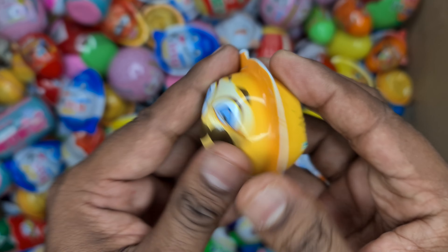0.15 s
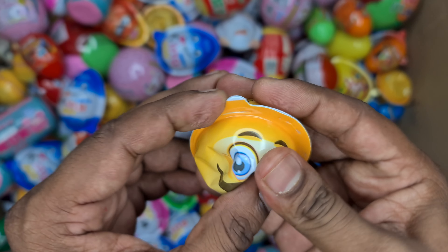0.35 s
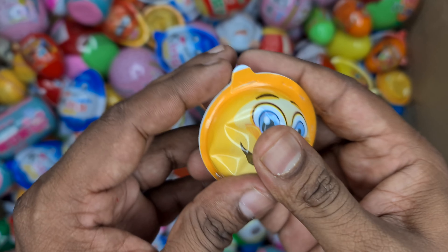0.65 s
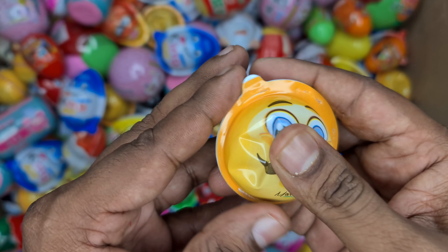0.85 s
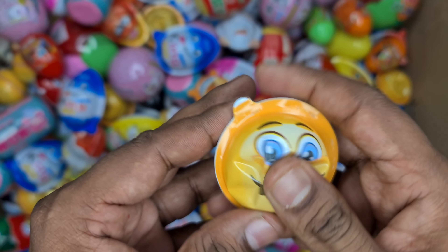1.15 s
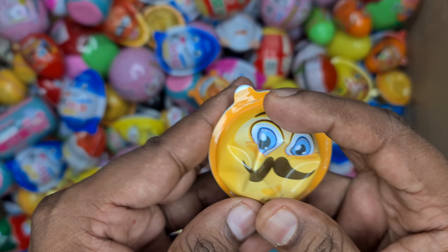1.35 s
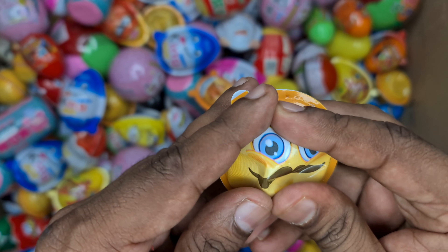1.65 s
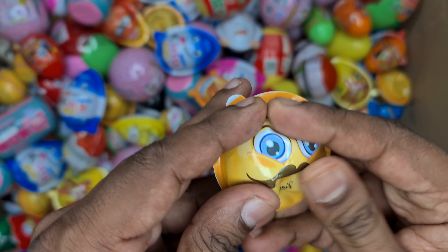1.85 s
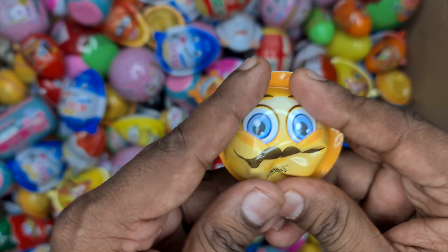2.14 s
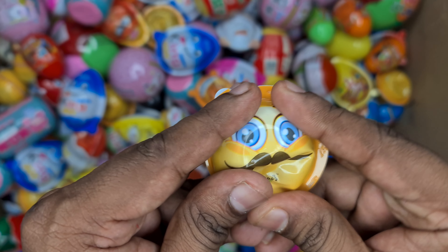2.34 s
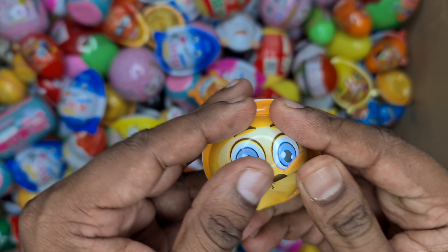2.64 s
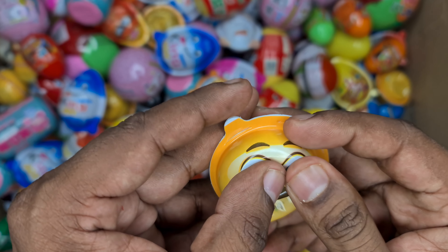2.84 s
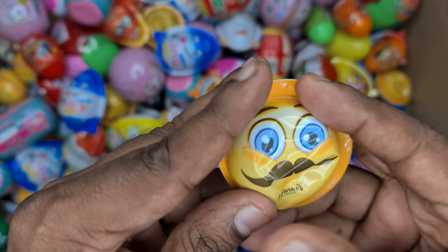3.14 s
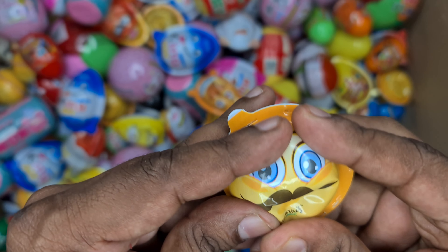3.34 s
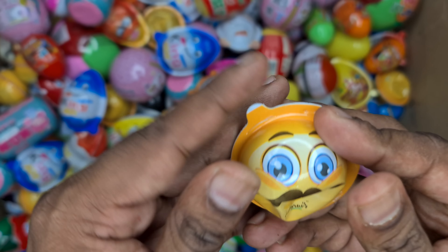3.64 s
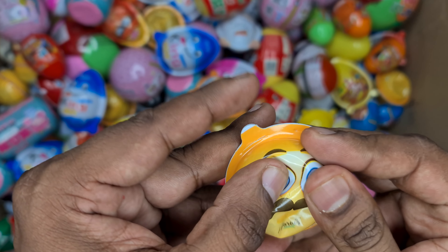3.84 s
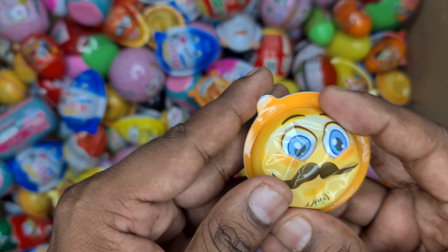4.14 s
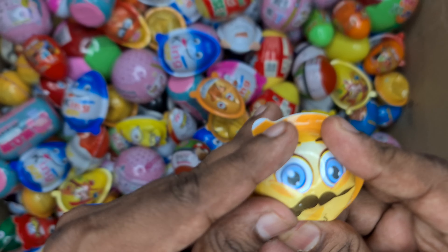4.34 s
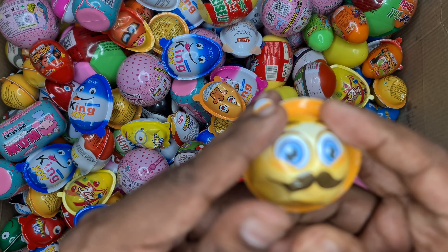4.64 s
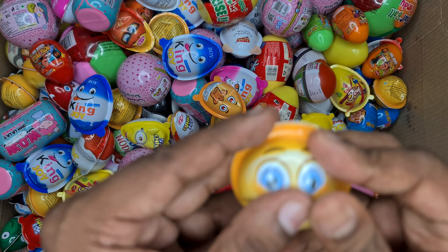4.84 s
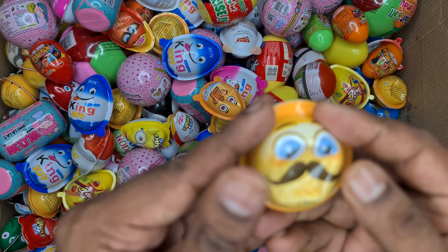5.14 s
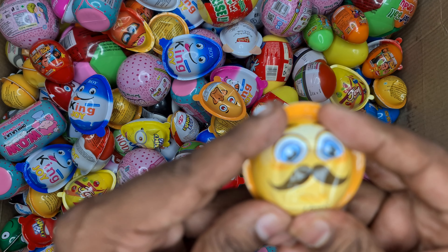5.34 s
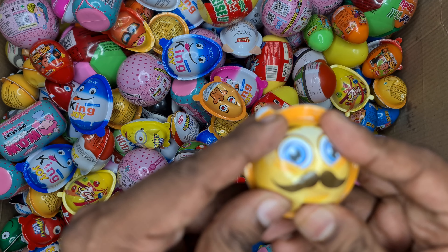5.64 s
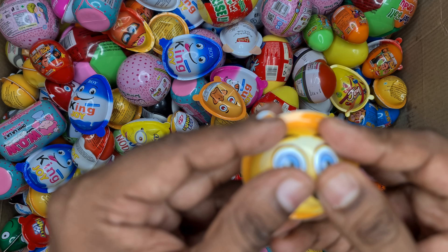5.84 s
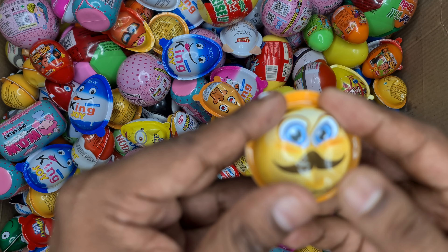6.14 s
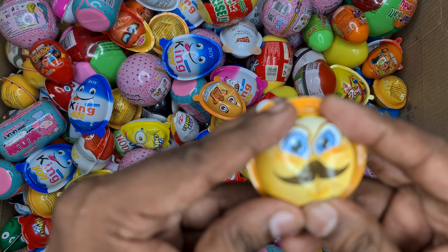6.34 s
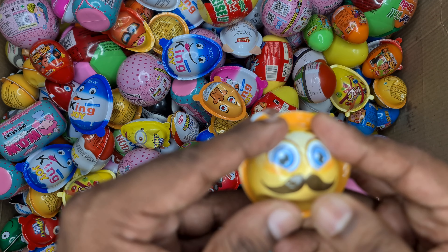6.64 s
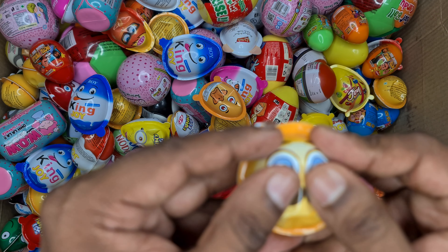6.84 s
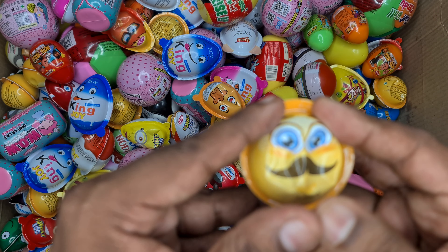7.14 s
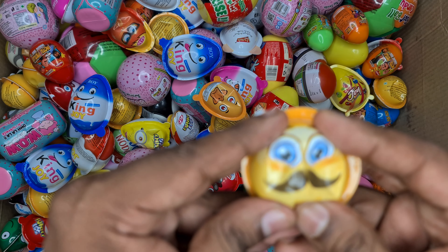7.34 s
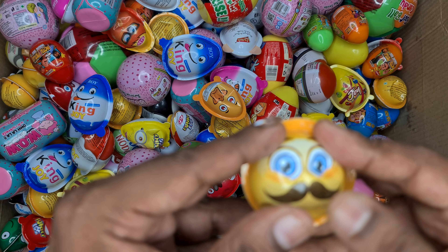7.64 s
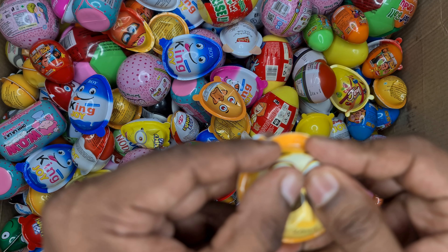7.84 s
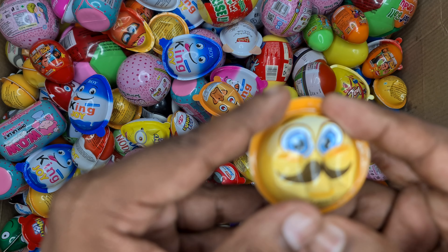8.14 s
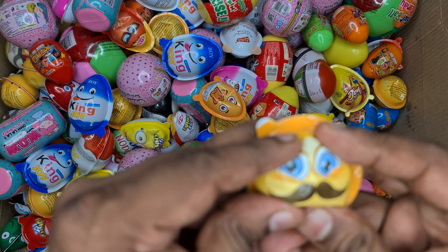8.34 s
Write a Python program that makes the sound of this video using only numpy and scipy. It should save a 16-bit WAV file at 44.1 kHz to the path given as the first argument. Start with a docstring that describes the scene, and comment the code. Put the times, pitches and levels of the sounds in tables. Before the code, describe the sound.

Close-up hollow plastic pops and bright creasing snaps from a hand-squeezed capsule, with faint wrapper crinkle and a short room echo.

```python
"""Squeezed plastic capsule

Two hands squeeze a thin plastic toy capsule with a foil-wrapper lid, close up in a small, live room.
About twice a second the walls buckle in clusters of snaps: filtered impulses pop, thud and ring the cup;
noise bursts crack the creases. Stick-slip grains make fingertip rubs; dense tiny ticks make a faint crinkle
that swells around each snap. Later the grip rumbles; decaying noise is the room echo, over a steady hush."""
import sys
import numpy as np
from scipy import signal
from scipy.fft import rfft, irfft
from scipy.io import wavfile

SR = 44100
rng = np.random.default_rng(int(sys.argv[2]) if len(sys.argv) > 2 else 0)


def generate_wav(signal):
    """Clip the signal to [-1, 1] and save it as 16-bit WAV at the path in sys.argv[1]."""
    frames = np.transpose(np.atleast_2d(signal))
    scaled = np.clip(frames, -1, 1) * 32767
    pcm = np.round(scaled).astype(np.int16)
    wavfile.write(sys.argv[1], SR, pcm)


N = 373968


def from_db(db):
    """Decibels to amplitude."""
    return 10 ** (np.asarray(db) / 20)


def rms_one(x):
    """Scales to unit rms."""
    return x / np.sqrt(np.mean(x ** 2) + 1e-20)


def energy_one(x):
    """Scales to unit energy."""
    return x / np.sqrt(np.sum(x ** 2) + 1e-20)


def at_hz(points, hz):
    """Reads a spectrum table on a log-frequency axis."""
    table = np.array(points)
    return np.interp(np.log(hz + 1e-3), np.log(table[:, 0]), table[:, 1])


def band(x, low_hz, high_hz):
    """Causal band-pass."""
    edges_hz = [low_hz, min(high_hz, SR / 2 - 500)]
    return signal.sosfilt(signal.butter(2, edges_hz, "band", fs=SR, output="sos"), x)


def coloured(x, spectrum):
    """Filters a noise by a spectrum table."""
    size = x.shape[-1]
    gain = from_db(at_hz(spectrum, np.fft.rfftfreq(size, 1 / SR)))
    return irfft(rfft(x) * gain, size)


def add(track, s, sound):
    """Mixes a short sound in at time s."""
    start = max(round(s * SR), 0)
    track[..., start:start + sound.shape[-1]] += sound[..., :max(N - start, 0)]


def placed(x, pan_db, lag_ms):
    """Makes left louder by pan_db and earlier by lag_ms."""
    left, right = np.broadcast_to(x, (2, x.shape[-1]))
    late_right = np.roll(right, round(lag_ms * SR / 1000))
    return np.array([left * from_db(pan_db / 2), late_right * from_db(-pan_db / 2)])


# likeness of the two ears in a diffuse field: (frequency_hz, correlation [-1..1])
EAR_LIKENESS = [(25, 0.31), (60, 0.23), (130, 0.044), (290, 0.14), (640, 0.64), (1400, -0.67),
                (3000, -0.015), (15000, 0.31)]


def diffuse_noise(size):
    """White noise from all around, its left-right correlation set per frequency."""
    mid, side = rfft(rng.standard_normal((2, size)))
    alike = np.clip(at_hz(EAR_LIKENESS, np.fft.rfftfreq(size, 1 / SR)), -1, 1)
    return irfft(np.sqrt(1 + alike) * mid + np.sqrt(1 - alike) * side * [[1], [-1]], size)


# still air of the room, relative spectrum: (frequency_hz, density_db_per_hz)
HUSH_COLOUR = [(25, -12.5), (45, -5.5), (70, 5), (120, -8), (200, -6), (400, -0.5), (560, -15),
               (900, -10.5), (1600, -20.5), (2600, -18.5), (5000, -24.5), (9000, -24), (13000, -21.5),
               (16000, -34)]


def hush(level_db=-69):
    """Steady diffuse noise of the still air."""
    return from_db(level_db) * rms_one(coloured(diffuse_noise(N), HUSH_COLOUR))


def sharpness(pop_db, crack_db, mid_db=-11.5, range_db=11.5):
    """Crack-to-pop ratio as character: 0 is a round wall pop, 1 a bare crease crack."""
    return .5 + .5 * np.tanh((crack_db - pop_db - mid_db) / range_db)


def pop_octaves(pop_db, thud_db, crack_db):
    """Bandwidth of the pop: sharp snaps flip faster and strong thuds flip deeper, so both are broader."""
    dull_octaves, sharp_octaves = 0.88, 1.28
    widen_octaves_per_db, thud_mid_db = 0.012, -14.0
    octaves = np.interp(sharpness(pop_db, crack_db), [0, 1], [dull_octaves, sharp_octaves])
    return octaves + widen_octaves_per_db * (thud_db - pop_db - thud_mid_db)


def pop(t, low_hz, high_hz, top_ratio=1.046, second_db=-9.5, second_max_ms=1.3):
    """A wall panel flips and swings as a band-passed impulse, then flips again, smaller."""
    panel = band(t == 0, low_hz, max(high_hz, 1.2 * low_hz))
    delay_ms = rng.uniform(0.27, 1) * second_max_ms
    swing = panel + from_db(second_db) * np.roll(panel, round(delay_ms * SR / 1000))
    # the flip takes time, so it carries little treble
    low_pass = signal.butter(3, high_hz * top_ratio, fs=SR, output="sos")
    return energy_one(signal.sosfilt(low_pass, swing))


def thud(t, low_hz=178.0, high_hz=624.0, jolt_low_hz=58.6, jolt_high_hz=133.0, jolt_db=-16.0):
    """The flip shoves the air in the cup, one low swing, and jolts the hands that hold it."""
    shove = energy_one(band(t == 0, low_hz, high_hz))
    jolt = energy_one(band(t == 0, jolt_low_hz, jolt_high_hz))
    return shove - from_db(jolt_db) * jolt


# crease spectrum, relative: (frequency_hz, density_db_per_hz)
CREASE_COLOUR = [(200, -22), (1500, -17.5), (2600, 7), (3300, 0.5), (4600, -0.5), (6500, -3), (9000, -2),
                 (12000, -3.5), (14000, -4.5), (16000, -11.5)]
CRACK_PEAK_S = .003  # crack start to its peak


def crack(t, hz, octaves=0.75, skirt=4.1, ring_db=-20.0, ring_t60_s=.014, apart=0.77):
    """A crease gives way in tiny slips, a noise burst brightest around its own pitch.

    Returns the grainy sound at the two ears, and the smooth sum of all directions that fills the room."""
    bins_hz = np.fft.rfftfreq(len(t), 1 / SR)
    # each crease has resonances of its own
    ripple_db = np.interp(bins_hz, np.geomspace(1500, 16000, 28), rng.normal(0, 2.8, 28))
    peak = 1 / np.sqrt(1 + np.abs(np.log2((bins_hz + 1) / hz) / octaves) ** skirt)
    colour = from_db(at_hz(CREASE_COLOUR, bins_hz) + ripple_db) * peak
    shared, left, right = rng.standard_normal((3, len(t)))
    slips = irfft(rfft(shared + apart * np.array([left, right])) * colour, len(t))
    # the noise swells for about 3 ms to its peak, then dies away
    before_s, after_s = np.maximum(CRACK_PEAK_S - t, 0), np.maximum(t - CRACK_PEAK_S, 0)
    swell_t60_s, slip_t60_s = .003, .0058
    swell = from_db(-60 * before_s / swell_t60_s)
    decay = from_db(-60 * after_s / slip_t60_s) + from_db(ring_db - 60 * after_s / ring_t60_s)
    all_round = np.roll(irfft(colour, len(t)), round(CRACK_PEAK_S * SR))
    return np.sqrt(2) * energy_one(slips * swell * decay), energy_one(all_round)


# cup resonances, damped by the fingers: (frequency_hz, level_db, t60_s)
CUP_RESONANCES = [(392, -5.5, 0.043), (787, -27.5, 0.16), (1066, -14, 0.078), (1330, -10.5, 0.084),
                  (1960, -22, 0.044), (2183, -17, 0.0077)]


def cup_ring(x):
    """Pops and thuds drive the cup modes, two-pole resonators of alternating sign."""
    out = 0
    for k, (hz, level_db, t60_s) in enumerate(CUP_RESONANCES):
        radius, angle = from_db(-60 / (t60_s * SR)), 2 * np.pi * hz / SR
        zeros = [1 - radius, 0, radius - 1]
        poles = [1, -2 * radius * np.cos(angle), radius * radius]
        # the tiny offset keeps the filter state off denormals
        out = out + (-1) ** k * from_db(level_db) * signal.lfilter(zeros, poles, x + 1e-18)
    return out


# buckling snaps, levels as 3 ms rms before trims, panning and cup ring:
# (peak_s, pop_db, pop_hz, thud_db, crack_db, crack_hz, into_room_db)
BUCKLES = [ (0.1529, -45, 1530, -61, -56.5, 7400, 8), (0.2662, -27, 1800, -60, -33.5, 3150, -1),
           (0.37, -26, 975, -35, -46, 3600, -1.5), (0.8284, -31, 1610, -63, -41, 6400, -1.5),
           (1.007, -53, 1410, -72, -56, 5800, 4), (1.06, -44.5, 1070, -56, -80, 5000, -4),
           (1.1998, -48, 1080, -58, -58, 7500, 3.5), (1.246, -39, 1190, -47.5, -55, 4300, 4.5),
           (1.6552, -54.5, 655, -47, -73.5, 5000, 3), (1.692, -32, 1510, -48, -47.5, 3500, 1.5),
           (1.7095, -24.5, 850, -31.5, -46, 3800, -0.5), (1.7227, -17.5, 1015, -20, -37, 4500, -3.5),
           (1.8232, -12.5, 1205, -22.5, -21, 4200, -2.5), (1.9541, -27.5, 1730, -50.5, -33, 4500, -1),
           (2.243, -56, 1120, -62, -68, 5000, -6), (2.37, -66, 1270, -62.5, -70, 3990, 0),
           (2.397, -54, 1070, -54, -52, 7000, 1), (2.4698, -47, 1810, -56.5, -36.5, 6500, 3.5),
           (2.528, -40, 1980, -61, -29, 8700, 1), (2.5961, -32, 1500, -45, -60.5, 3900, 5.5),
           (2.6577, -31.5, 1450, -50.5, -28, 4800, 2.5), (2.785, -17, 1216, -48, -32, 4300, 3.5),
           (2.797, -13, 1950, -39.5, -17, 6500, 1.5), (2.9137, -32, 1130, -36.5, -57, 6500, -3),
           (2.9214, -35, 1520, -45.5, -23, 6300, 0), (3.1147, -23.5, 1140, -39, -71, 4300, 1),
           (3.152, -22, 790, -27.5, -60, 3200, -15), (3.1919, -29.5, 893, -62, -37.5, 6000, -4),
           (3.317, -55.5, 960, -78, -78, 4000, -5), (3.3884, -46.5, 1430, -45.5, -47.5, 3600, 17.5),
           (3.4063, -16.5, 1282, -26, -18.5, 7500, 7.5), (3.6042, -44.5, 2210, -58, -45.5, 3400, 2.5),
           (3.6548, -48, 1350, -53, -53.5, 5600, -1.5), (3.8168, -26.5, 765, -32, -46, 5500, 4),
           (3.835, -20, 1930, -34.5, -15, 6500, 6.5), (3.913, -35.5, 1420, -44, -19, 9000, 6.5),
           (4.0638, -38.5, 875, -56.5, -59, 6000, 3), (4.0723, -34, 1890, -60, -37.5, 3400, -2.5),
           (4.2804, -30.5, 1040, -45, -69, 4300, -4), (4.3115, -20, 1220, -37.5, -40.5, 3900, -3),
           (4.365, -32.5, 1020, -37, -68, 5000, -6), (4.373, -22, 795, -31, -68.5, 4900, -5),
           (4.4083, -19, 1080, -18.5, -24.5, 5100, 1), (4.4178, -20, 990, -28, -30, 5200, -9),
           (4.4776, -29.5, 2010, -47, -13, 8300, 1.5), (4.4843, -11.5, 1620, -22, -19, 5200, -1),
           (4.6329, -34.5, 1260, -42.5, -47, 4700, 1), (4.787, -56.5, 890, -76.5, -54, 8800, -9.5),
           (4.9182, -42.5, 900, -49, -46.5, 5000, 3.5), (4.926, -22.5, 1155, -38.5, -38.5, 5900, 9),
           (4.9385, -14, 1780, -33, -15.5, 7300, 6), (4.9711, -13, 1420, -27, -17.5, 5700, 7),
           (4.9946, -16, 1230, -26, -23.5, 4800, -5.5), (5.124, -41.5, 1128, -53, -56.5, 4300, 2),
           (5.1612, -44.5, 1052, -55, -62, 4500, -1), (5.4197, -52, 957, -58.5, -68, 5000, 2),
           (5.433, -35, 1330, -38, -27.5, 6800, 3), (5.4702, -20, 1400, -37, -32.5, 6400, 1.5),
           (5.482, -43, 920, -47, -43.5, 6000, -4), (5.5003, -12, 880, -33.5, -18, 5500, -6),
           (5.6748, -39, 1380, -43.5, -26, 7300, 1.5), (5.7031, -25, 1236, -34, -37, 5200, 0.5),
           (5.7327, -40, 874, -47, -51.5, 4900, -2), (5.76, -46, 1240, -53.5, -62.5, 6700, 0.5),
           (5.927, -18.5, 1270, -37.5, -25, 3600, 4.5), (5.94, -30.5, 1620, -33, -13.5, 7400, 5.5),
           (5.963, -20, 1340, -27.5, -14, 7900, 10), (6.1193, -36, 972, -39.5, -34.5, 9300, 6.5),
           (6.1257, -27.5, 1440, -36, -23, 6900, 1), (6.402, -55, 894, -58, -63, 4000, 0.5),
           (6.4342, -31, 1830, -51, -34, 4850, 0), (6.461, -14, 1180, -29, -24.5, 4000, -1.5),
           (6.4701, -30.5, 970, -27.5, -42.5, 4000, -2), (6.4728, -9, 1015, -19.5, -31.5, 4500, -9),
           (6.5128, -19, 1200, -39, -14.5, 7900, 5.5), (6.6703, -34, 1600, -43, -22, 7400, 1.5),
           (6.898, -39, 1650, -52.5, -46, 3400, 1), (6.92, -14, 1470, -29.5, -17, 6850, 4),
           (6.9273, -19.5, 1360, -32, -36.5, 3700, 7), (6.9314, -19.5, 1650, -36, -37, 3700, -2),
           (6.9343, -20.5, 1310, -36.5, -13.5, 7900, 5), (7.3698, -49, 1610, -63, -58.5, 3200, 4),
           (7.408, -29.5, 1770, -52.5, -24.5, 4570, -0.5), (7.415, -13.5, 1330, -37, -26, 6600, 3),
           (7.4251, -10, 1040, -22, -21, 5800, -3), (7.4382, -15, 1230, -28.5, -14, 8900, -2),
           (7.4586, -16.5, 980, -36.5, -28.5, 4700, -6), (7.6227, -40.5, 1450, -70, -50, 3500, 5),
           (7.6349, -46, 1790, -55.5, -39.5, 5600, 1.5), (7.8344, -36, 1100, -43.5, -49, 5400, 1),
           (7.8398, -28, 1060, -47.5, -65, 6000, -7.5), (7.8588, -33.5, 1600, -63.5, -31, 5000, 17),
           (7.8668, -13, 1550, -26, -44, 5200, 3), (7.871, -24, 1260, -33, -10.5, 8300, 2.5),
           (7.8772, -16.5, 1360, -50, -15.5, 8200, 0.5), (8.2821, -35, 1230, -65, -41, 6300, -1),
           (8.3403, -24.5, 1240, -51, -43, 5300, -1), (8.346, -28, 1800, -31.5, -17, 7300, -2),
           (8.357, -12, 1400, -36, -42, 6300, -6), (8.361, -13.5, 1220, -35, -33, 4000, 3),
           (8.3674, -20.5, 1620, -34, -24.5, 6100, 2), (8.3773, -9.5, 1000, -19.5, -44, 5700, -7.5),
           (8.3796, -16, 1070, -53, -28, 7500, -3), (8.3878, -15.5, 1070, -51, -28, 5800, -10),
           (8.422, -19.5, 1380, -37, -14, 7700, 1)]


def snaps(thud_trim_db=-3.0, pop_room_db=-11.0, thud_room_db=-15.5, crack_room_db=-12.0, ring_db=6.0):
    """Each buckle sums pop, thud and crack; returns the direct sound and the sound thrown into the room."""
    t = np.arange(1024) / SR
    wall_lead_s, level_window_s = 0.0011, .003
    walls, creases, thrown = np.zeros((2, N)), np.zeros((2, N)), np.zeros(N)
    for peak_s, pop_db, pop_hz, thud_db, crack_db, crack_hz, into_room_db in BUCKLES:
        half_width = 2 ** (pop_octaves(pop_db, thud_db, crack_db) / 2)
        shove = from_db(thud_db + thud_trim_db) * thud(t)
        swing = from_db(pop_db) * pop(t, pop_hz / half_width, pop_hz * half_width)
        crease, all_round = crack(t, crack_hz)
        crease_lag_ms = rng.normal(.06, .04)  # each snap faces its own way
        # both start early, so that they peak together
        wall_s, crease_s = peak_s - wall_lead_s, peak_s - CRACK_PEAK_S
        wall = placed(swing, pan_db=-3.0, lag_ms=0.08) - placed(shove, pan_db=0.0, lag_ms=.06)
        add(walls, wall_s, wall)
        add(creases, crease_s, from_db(crack_db) * placed(crease, pan_db=1.0, lag_ms=crease_lag_ms))
        # the room share scales pop and crack, not thud
        add(thrown, wall_s, from_db(into_room_db + pop_room_db) * swing - from_db(thud_room_db) * shove)
        add(thrown, crease_s, from_db(crack_db + into_room_db + crack_room_db) * all_round)
    size = np.sqrt(level_window_s * SR)  # unit energy to unit rms over the window
    direct = walls + from_db(ring_db) * cup_ring(walls) + creases
    return size * direct, size * thrown


# wrapper tick spectrum, relative: (frequency_hz, density_db_per_hz)
FOIL_COLOUR = [(200, -23), (600, -2), (1200, 4.5), (2200, 2), (3500, -9.5), (6000, -11.5), (11000, -12),
               (16000, -29.5)]


def crinkle(ticks_per_s=1600.0, near_snap_db=-22.5, idle_db=-82.0, spread_db=4.0):
    """Dense tiny wrapper ticks, faint throughout and louder for a few ms around each snap."""
    rise_s, fall_s = 0.0057, 0.0058
    t, near_snap = np.arange(0, N, 40) / SR, 0
    for peak_s, pop_db, _, _, crack_db, _, _ in BUCKLES:
        distance = np.maximum((peak_s - t) / rise_s, (t - peak_s) / fall_s)
        near_snap = near_snap + from_db(max(pop_db, crack_db)) * np.exp(-distance)
    born = rng.random(N) < ticks_per_s / SR
    size = from_db(spread_db * np.minimum(rng.exponential(1, N), 3))
    ticks = born * rng.choice([-1, 1], N) * size
    level = np.interp(np.arange(N) / SR, t, from_db(idle_db) + from_db(near_snap_db) * near_snap)
    return level * rms_one(coloured(ticks, FOIL_COLOUR))


# fingertip strokes, levels before panning: (middle_s, length_s, pad_db, nail_db)
STROKES = [(0.22, 0.0097, -42, -43.5), (0.498, 0.013, -53, -55.5), (0.602, 0.033, -67, -75),
           (0.64, 0.02, -64.5, -61.5), (0.684, .02, -59, -67), (0.753, 0.069, -65.5, -71),
           (0.928, .016, -74, -55), (0.958, 0.021, -57, -54.5), (1.021, 0.026, -64, -66),
           (1.241, 0.023, -50, -49.5), (1.284, 0.02, -60.5, -66), (1.548, 0.011, -46, -46.5)]
# finger pad on the wall, relative: (frequency_hz, density_db_per_hz)
SKIN_COLOUR = [(300, -32), (700, -15), (1100, 5.5), (1600, -0.5), (2300, -4), (3500, -19), (8000, -35.5)]
# fingernail on the wrapper, relative: (frequency_hz, density_db_per_hz)
SCRATCH_COLOUR = [(1000, -19.5), (2500, -2.5), (5000, -1.5), (7000, 3), (10000, -2), (16000, -20.5)]


def rubs(grain_spread_db=4.5, light_per_s=550.0, pressed_per_s=4100.0):
    """Skin and nail stick and slip in uneven grains, which come faster under more pressure."""
    t, out = np.arange(N) / SR, 0
    middles_s, lengths_s, pad_db, nail_db = np.transpose(STROKES)
    for levels_db, colour in ((pad_db, SKIN_COLOUR), (nail_db, SCRATCH_COLOUR)):
        pressure = 0
        for middle_s, length_s, level_db in zip(middles_s, lengths_s, levels_db):
            pressure = pressure + from_db(level_db) * np.exp(-2 * ((t - middle_s) / length_s) ** 2)
        slips_per_s = light_per_s + pressed_per_s * np.sqrt(pressure / pressure.max())
        # dividing by the root of the rate keeps the power steady
        born = (rng.random(N) < slips_per_s / SR) / np.sqrt(slips_per_s)
        size = from_db(grain_spread_db * np.minimum(rng.exponential(1, N), 3))
        grains = born * rng.standard_normal(N) * size
        out = out + pressure * rms_one(coloured(grains, colour))
    return out


# decay of the diffuse tail: (frequency_hz, t60_s)
TAIL_T60 = [(100, 0.64), (400, 0.38), (1000, 0.38), (2500, 0.43), (5000, 0.4), (9000, 0.35), (15000, 0.25)]
# gain of the echo: (frequency_hz, gain_db)
ECHO_COLOUR = [(80, -4.5), (250, 3), (500, 4.5), (850, -6.5), (1250, -6.5), (1700, -0.5), (2300, -1),
               (3100, -1), (4200, 1.5), (6000, -2), (10000, -5.5), (15000, -1.5)]


def room(x, build_s=0.006, near_db=-4.0, near_t60_s=0.058):
    """Early echoes off box and table, then a diffuse tail that dies band by band, by convolution."""
    size = int(.7 * SR)
    t, hz = np.arange(size) / SR, np.fft.rfftfreq(size, 1 / SR)
    noise, centres_hz, response = rfft(diffuse_noise(size)), np.geomspace(100, 15000, 12), 0
    early = energy_one(from_db(-60 * t / near_t60_s) * (t > .002))
    for k, centre_hz in enumerate(centres_hz):
        share = np.interp(np.log(hz + 1), np.log(centres_hz), np.arange(len(centres_hz)) == k)
        decay = from_db(-60 * t / at_hz(TAIL_T60, centre_hz))
        tail = energy_one(decay * (1 - np.exp(-(t / build_s) ** 2)))
        envelope = np.hypot(tail, from_db(near_db) * early)
        response = response + irfft(noise * share, size) * envelope * from_db(at_hz(ECHO_COLOUR, centre_hz))
    return signal.fftconvolve(x[None], response, axes=1)[:, :N]


# shifts of the grip: (peak_s, level_db, t60_s)
GRIP_SHIFTS = [(5.505, -54.5, 0.7), (5.97, -52.5, 1.54), (6.54, -64.5, 1)]


def grip(low_hz=50.0, high_hz=130.0, attack_s=.04):
    """Palms rolling on the shell: low noise that swells quickly and dies away."""
    t, level = np.arange(N) / SR, 0
    for peak_s, level_db, t60_s in GRIP_SHIFTS:
        swell = np.clip(1 + (t - peak_s) / attack_s, 0, 1)
        level = level + from_db(level_db - 60 * np.maximum(t - peak_s, 0) / t60_s) * swell
    return level * rms_one(band(diffuse_noise(N), low_hz, high_hz))


def scene():
    """Mixes snaps, rubs and crinkle near the microphone with their echo, grip rumble and hush."""
    direct, thrown = snaps()
    handling = crinkle() + rubs()
    echo = room(thrown + from_db(-11.5) * handling)
    return hush() + direct + placed(handling, pan_db=-6.0, lag_ms=.07) + echo + grip()


def record(dry):
    """Rounds the tallest peaks by soft saturation and cuts the top."""
    ceiling, cutoff_hz = 1.3, 17000
    rounded = ceiling * np.tanh(dry / ceiling)
    return signal.sosfilt(signal.cheby2(18, 85, cutoff_hz, fs=SR, output="sos"), rounded)


dry = scene()
out = record(dry)
generate_wav(out)
```